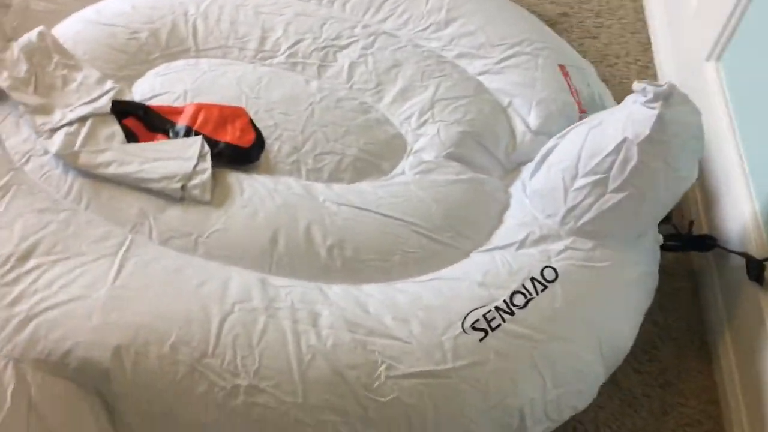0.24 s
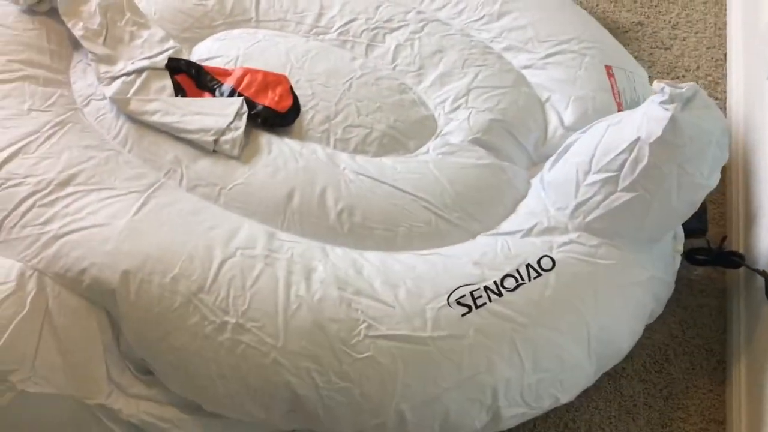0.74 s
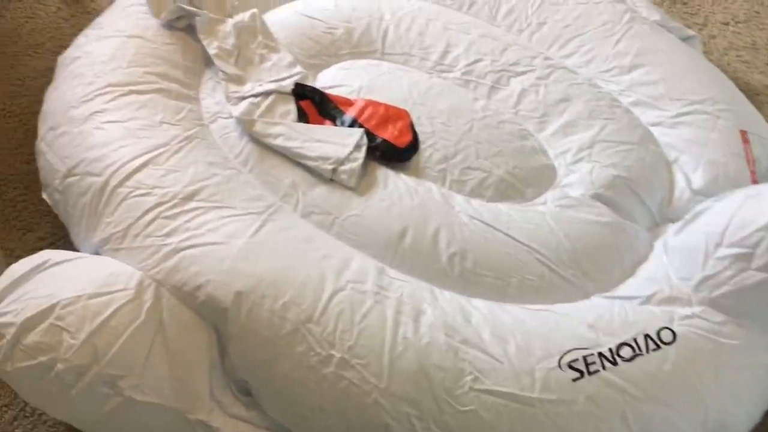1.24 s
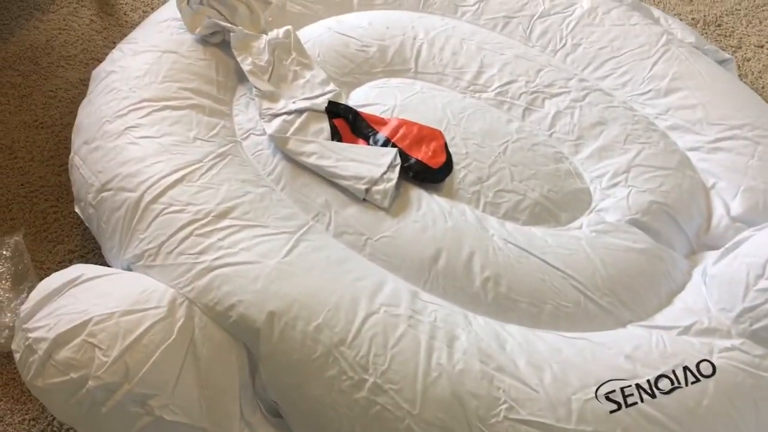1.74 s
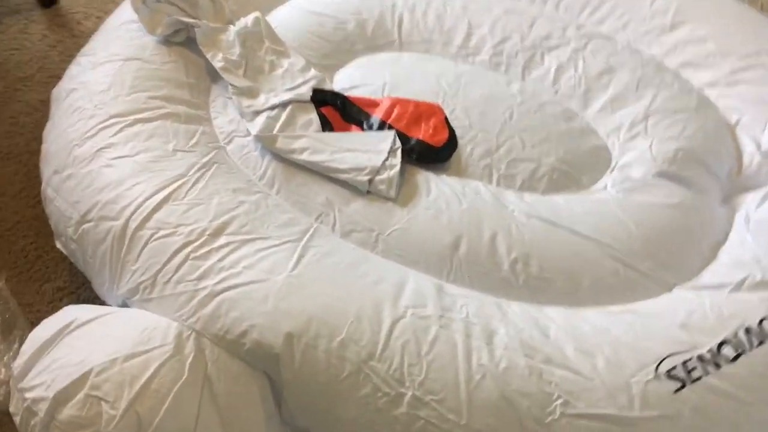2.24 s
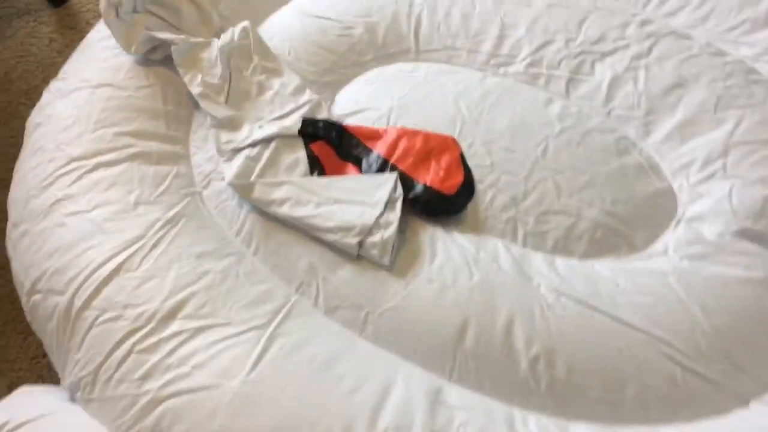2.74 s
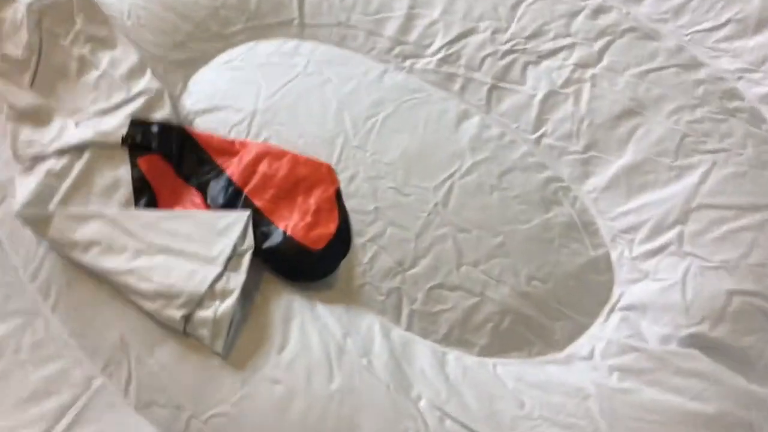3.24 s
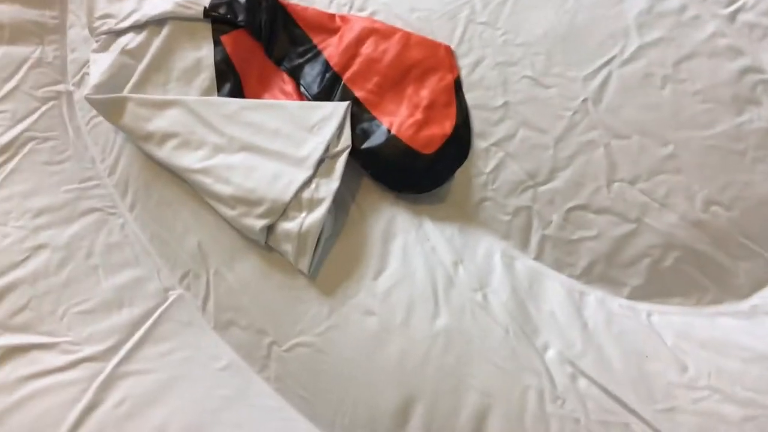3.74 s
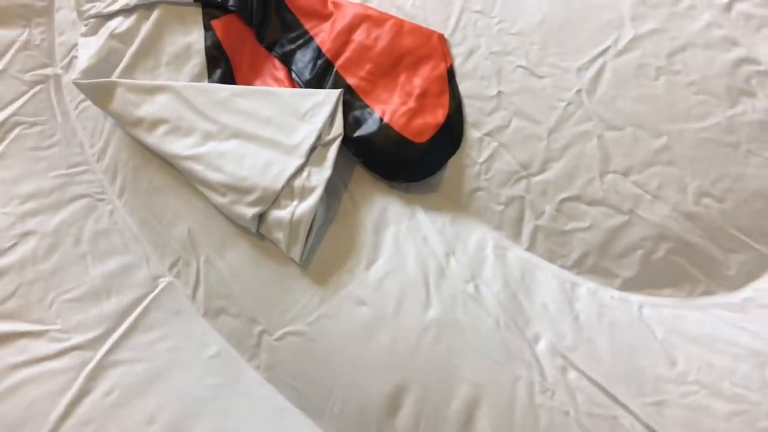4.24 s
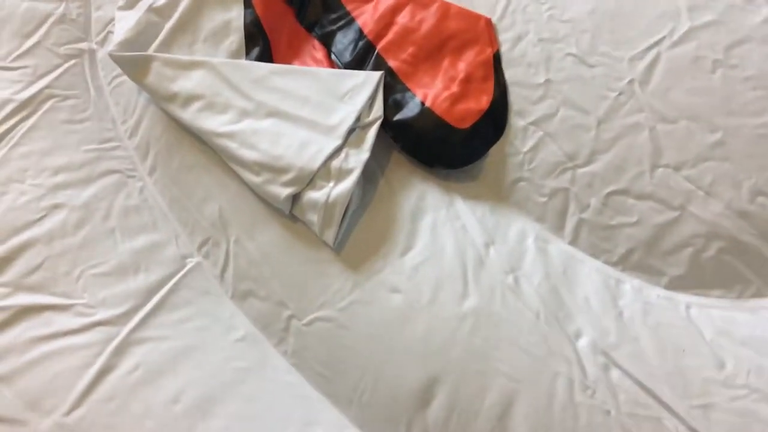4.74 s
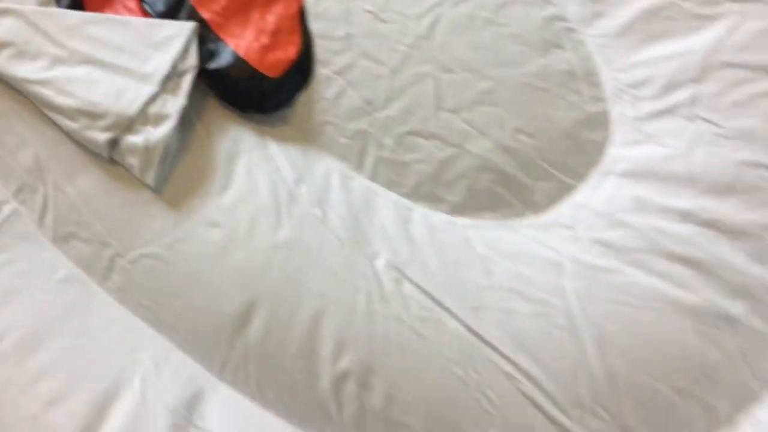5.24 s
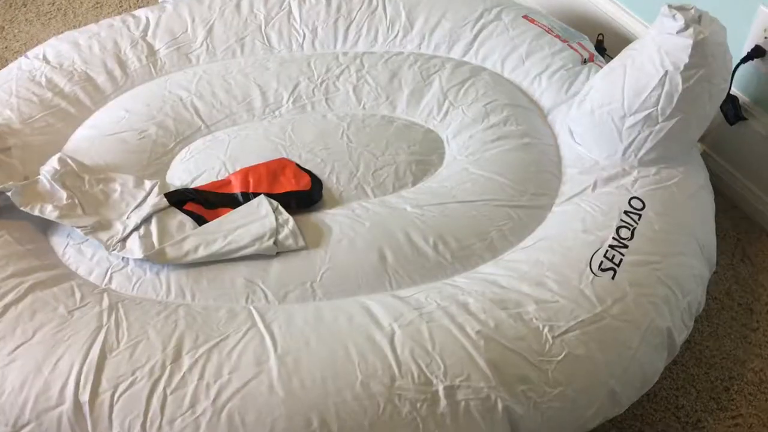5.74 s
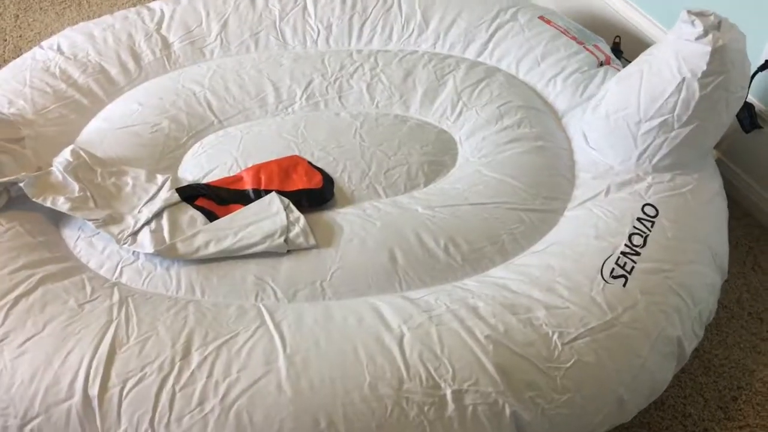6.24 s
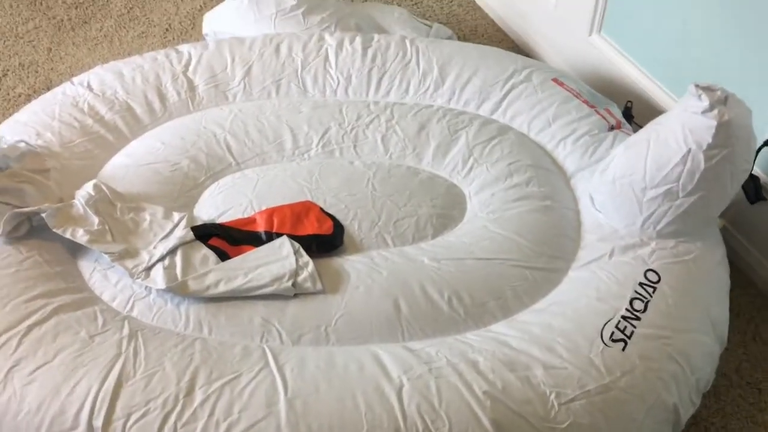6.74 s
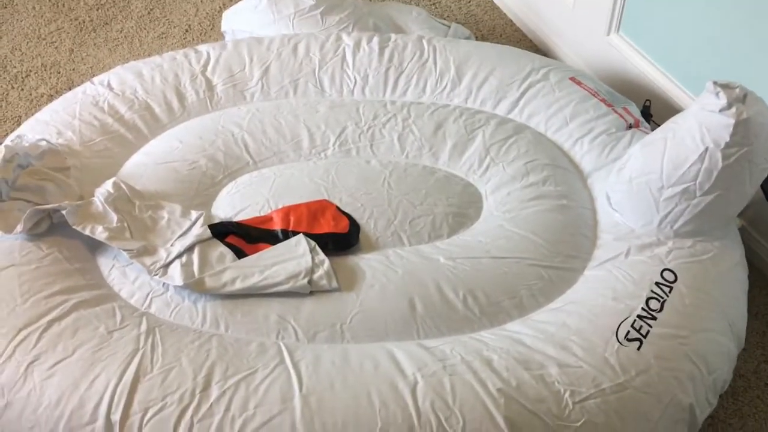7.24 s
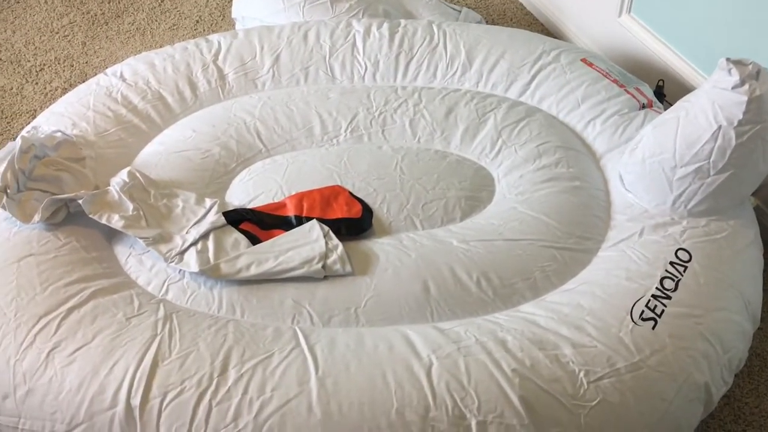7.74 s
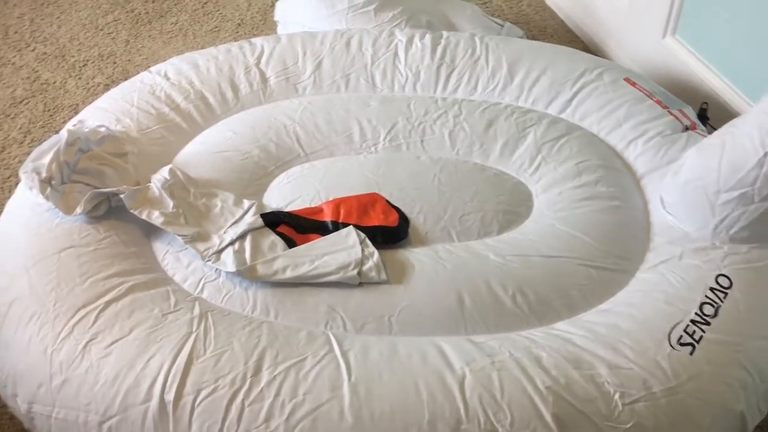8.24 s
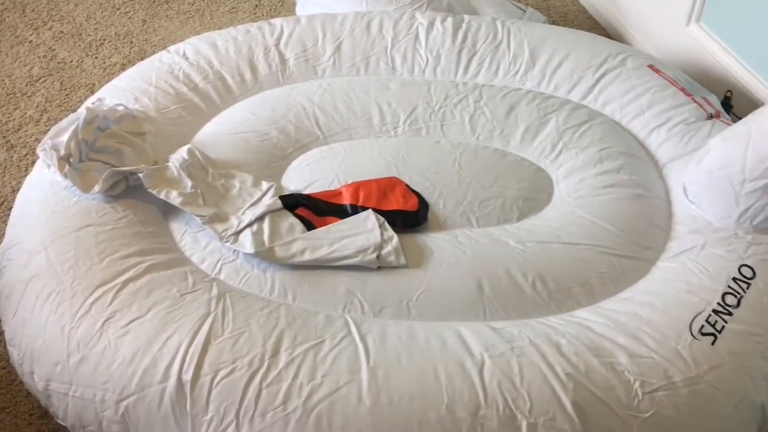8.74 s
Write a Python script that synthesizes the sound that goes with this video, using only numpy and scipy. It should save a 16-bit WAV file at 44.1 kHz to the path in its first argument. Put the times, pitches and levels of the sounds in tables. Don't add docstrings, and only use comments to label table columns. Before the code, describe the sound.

A small electric blower is already running at full noise, filling a large vinyl float on carpet in a small room. A broad, hissy rush of air carries a high whine that swells and fades as the handheld microphone drifts, strongest around 0.2, 0.8 and 2.8 s. A faint low groan of stretching vinyl slides down at 0.3-0.6 s, and a soft bump comes at 1.4 s. From about 1.5 s the motor pitch sags gradually. Near 4.1 s the air becomes louder and more nozzle-like; at 4.64 s a very short burst of treble marks a further pitch drop under load. Dull slaps on the skin follow at 4.7, 4.85 and 5.1 s. At 5.54 s the sound dips out and returns abruptly: steady pitch, whine mostly buried, smoother rush and clearer mains hum. A deep soft thump lands at 8.4 s, and the blower runs on to the end at 9 s.

```python
import sys
import numpy as np
from scipy import signal
from scipy.fft import rfft, irfft, next_fast_len
from scipy.io import wavfile

SR = 44100
rng = np.random.default_rng(int(sys.argv[2]) if len(sys.argv) > 2 else 0)


def volts_from_db(level):
    exponent = np.asarray(level, float) / 20
    return 10 ** exponent


def master_out(mix):
    frames = np.transpose(np.atleast_2d(mix))
    ceiling = np.clip(frames, -1, 1)
    pcm = np.round(ceiling * 32767).astype(np.int16)
    wavfile.write(sys.argv[1], SR, pcm)


N = 396454
GUST_S = 4.64
TOP_HZ = 15720

SPOT_ENDS_S = [0, 4.135, 4.67, 5.541, 9]
CHANGE_S = SPOT_ENDS_S[3]
# (time [s], facing the intake [dB], shaded from the housing by the float [dB])
MICROPHONE = [(0, -3.5, -0.5), (1.3, -3.5, 1), (1.9, -0.8, 1), (2.15, 0.5, -1.5), (2.43, -1, -2),
              (2.73, 3.5, -5), (3.22, 5, -2), (3.42, -1, -7), (3.8, -0.5, -7), (4.1, -0.5, -17),
              (4.5, -1.5, -9.5), (4.62, -2, -8), (5, -1, -5), (5.5, 0, -4), (5.9, 0.5, -9), (7.2, 1.3, -8),
              (8.1, -0.3, -10.5), (9, 1, -10)]


def columns(table):
    s, *rest = np.transpose(table)
    return [np.interp(np.arange(N) / SR, s, column) for column in rest]


def walk(rate):
    return np.interp(np.arange(N) * (rate / SR), np.arange(400), 1.2 * rng.standard_normal(400))


def tone(hz, db):
    turns = np.cumsum(hz + np.zeros(N)) / SR
    return np.sqrt(2) * volts_from_db(db) * np.sin(2 * np.pi * (turns + rng.random()))


def bell(s, width):
    out = np.zeros(N)
    start, stop = max(int((s - 3 * width) * SR), 0), min(int((s + 3 * width) * SR), N)
    t = np.arange(start, stop) / SR
    out[start:start + len(t)] = np.exp(-((t - s) / width) ** 2)
    return out


def speed():
    # (time [s], speed [Hz])
    sag = [(0, 716.3), (.45, 715.7), (.75, 717.2), (1.5, 712.8), (1.75, 708.2), (2, 701.9), (2.25, 698.9),
           (2.75, 680.4), (3, 677.5), (3.5, 667.5), (3.75, 665.8), (4, 660.7), (4.25, 647.7), (4.4, 640.8),
           (4.64, 636.4)]
    loaded_hz, settles_s, later_hz = 593.2, .14, 623.6
    t = np.arange(N) / SR
    loaded = loaded_hz + (sag[-1][1] - loaded_hz) * np.exp(-np.maximum(t - GUST_S, 0) / settles_s)
    early = np.where(t > GUST_S, loaded, columns(sag)[0])
    return np.where(t > CHANGE_S, later_hz, early)


def crossings(peaks, trough_db):
    return 20 * np.log10(volts_from_db(trough_db) + sum(volts_from_db(db) * bell(s, width) for s, width, db in peaks))


def whistles(hz, late):
    # (shaft multiple, plus mains ripples, time [s], half width [s], level [dB])
    weak_whistles = [(2, 0, .7, 1.15, -46), (2, 0, 3.64, 0.37, -48), (3, 0, .3, 0.66, -44.5),
                     (3, 0, 3.5, 1.2, -46), (3, 1, 4.9, 1.7, -43), (3, 2, .9, .9, -59),
                     (3, 2, 3.91, 0.29, -39.5), (4, 0, 1.4, 2, -48.5), (4, 0, 4.1, .8, -49),
                     (4, 1, 2.7, 2.9, -52), (4, 2, 1.9, 2.2, -67), (5, 0, .9, 2.1, -47.5),
                     (5, 0, 4.3, 0.48, -54), (5, 1, 0.24, .9, -48.5), (5, 2, 3.2, 0.76, -46.5),
                     (6, 0, 0.82, 1.2, -52), (6, 1, 1.2, .8, -45), (5, 1, 2.3, 0.88, -45),
                     (11, 0, 1.2, 0.65, -53), (4, 0, 4.8, 2.5, -54), (5, 0, 9.2, 2.3, -45),
                     (1, 1, 7.3, 2.9, -53), (11, 0, 7.3, 2.3, -71), (12, 0, 7, 2.1, -49)]
    ripple_hz, swim_db, swim_per_s = 240, 3, 7
    t, turns, out = np.arange(N) / SR, np.cumsum(hz) / SR, np.zeros(N)
    for multiple, ripples, s, width, db in weak_whistles:
        heard = bell(s, width) * (late == (s > CHANGE_S))
        on = heard > 0
        cycles = np.rint(multiple) * turns[on] + np.rint(ripples) * ripple_hz * t[on] + rng.random()
        level = heard[on] * volts_from_db(db + swim_db * walk(swim_per_s)[on])
        out[on] += np.sqrt(2) * level * np.sin(2 * np.pi * cycles)
    return out


def hum(late):
    # (pitch [Hz], level [dB], level after the change [dB])
    mains = [(240, -62, -54), (480, -64, -54.5)]
    return sum(tone(f, np.where(late, late_db, db) + walk(9)) for f, db, late_db in mains)


def motor():
    # (blade-pass level [dB], twice blade-pass level [dB])
    troughs = [
        (-42, -47),
        (-44.5, -48),
    ]
    # (time [s], half width [s], level [dB])
    blade_peaks = [(.17, 0.086, -32), (.5, 0.13, -47), (.79, 0.17, -28.5), (1.25, .09, -44),
                   (1.62, .06, -41), (1.8, 0.066, -33.5), (2.15, 0.22, -42), (2.5, 0.074, -35),
                   (2.8, 0.15, -26), (3.08, 0.14, -29), (3.4, 0.18, -35.5), (3.86, 0.22, -37.5),
                   (4.76, 0.17, -33.5), (5.1, 0.043, -42), (5.32, 0.089, -38), (5.78, 0.11, -50),
                   (6.4, 0.089, -56), (7.55, 0.14, -46.5), (8.1, 0.3, -48.5), (9, .12, -47)]
    # (time [s], half width [s], level [dB])
    twice_peaks = [(.05, .17, -42), (.62, .1, -44), (.88, .1, -49), (2.2, .07, -45), (2.75, 0.38, -51),
                   (3.02, 0.084, -38), (3.28, .09, -39), (3.5, .05, -39), (3.75, .08, -43), (4.1, .07, -55),
                   (4.38, .07, -37.5), (4.65, 0.085, -34), (4.79, 0.068, -36), (5.1, .06, -36),
                   (5.3, 0.051, -41), (5.52, 0.067, -45), (6.4, .3, -54), (8.4, 0.33, -48),
                   (8.95, 0.17, -47)]
    late = np.arange(N) / SR > CHANGE_S
    blade_trough_db, twice_trough_db = np.array(troughs)[late.astype(int)].T
    shaft_db = -39 + columns(MICROPHONE)[1]
    blade_db = crossings(blade_peaks, blade_trough_db)
    twice_db = crossings(twice_peaks, twice_trough_db)

    hz = speed() * (1 + 0.00042 * walk(36))
    out = tone(hz, shaft_db + 0.72 * walk(21))
    out += tone(10 * hz, blade_db + 2.66 * walk(32))
    out += tone(20 * hz, twice_db + 2.4 * walk(31))
    return out + whistles(hz, late) + hum(late)


def room():
    echo_t60_s, echo_db = 0.19, -5
    t = np.arange(SR // 2) / SR
    tail = rng.standard_normal(len(t)) * volts_from_db(-60 * t / echo_t60_s) * (t > .003)
    dulled = signal.lfilter(*signal.butter(1, 10000, fs=SR), tail)
    echo = volts_from_db(echo_db) * dulled / np.sqrt(np.sum(tail ** 2))
    echo[0] = 1
    return echo


def swell(spot, span):
    follows_facing = [.01, -0.2, 0.0035, 0.42, .55, 0.37, 0.023, 1.32, 0.52]
    follows_shade = [-0.037, 0.46, -0.14, -0.2, -0.036, 0.039, -0.28, 0.045, -.3]
    beam_late_s = [0, -0.053, 0.077, 0.16, -0.42, 0.17, 0.2, 0.01, .2]
    shade_mean_db = [-9.5, -18, -17.5, -13]
    nozzle_opens_db, nozzle_opens_s = 1, 0.33
    t = np.arange(N)[span] / SR
    s, facing_db, shade_db = np.transpose(MICROPHONE)
    shade_db = np.interp(t, s, shade_db) - shade_mean_db[spot]
    out = np.array([facing * np.interp(t - late, s, facing_db) + shade * shade_db
                    for facing, shade, late in zip(follows_facing, follows_shade, beam_late_s)])
    if spot == 1:
        out[2] += nozzle_opens_db * np.clip(1 - (t - SPOT_ENDS_S[1]) / nozzle_opens_s, 0, 1)
    return out


def air(swell_db, colour, rings, db, span):
    swell_hz = [250, 900, 2500, 3400, 4700, 7500, 9600, 11500, 14300]
    n = span.stop - span.start
    size = next_fast_len(n)
    hz = np.maximum(np.arange(size // 2 + 1) * SR / size, 1)
    colour_hz, colour_db = np.transpose(colour)
    gain_db = np.interp(np.log(hz), np.log(colour_hz), colour_db)
    gain_db += sum(peak_db / (1 + (2 * (hz - f) / width) ** 2) for f, width, peak_db in rings)
    noise = rfft(rng.standard_normal(size)) * rfft(room(), size) * volts_from_db(gain_db) * (hz < TOP_HZ)
    noise *= volts_from_db(db) * size / np.sqrt(2 * np.sum(np.abs(noise) ** 2))

    centres = np.log([250, 900, 1500, 2500, 3400, 4700, 7500, 9600, 11500, 14300])
    flutter_db = (0.52 * walk(7.2) + 0.27 * walk(23))[span]
    out = np.zeros(N)
    for centre, share in zip(centres, np.eye(len(centres))):
        mix = [np.interp(centre, np.log(swell_hz), row) for row in np.eye(len(swell_hz))]
        band_db = mix @ swell_db + flutter_db + .6 * walk(9)[span]
        band = irfft(noise * np.interp(np.log(hz), centres, share), size)[:n]
        out[span] += volts_from_db(band_db) * band
    return out


def blower_air():
    # (frequency [Hz], level [dB per Hz])
    colours = [
        [(30, -43), (60, -30), (100, -15), (200, -24.5), (400, -5), (650, -8), (1300, -1.9), (2400, -1.5),
         (3500, -6), (5500, -4.5), (7200, -1.5), (9800, -7.5), (11500, -2), (15700, -11.5)],
        [(30, -54), (60, -26), (100, -26), (200, -20), (400, -12.5), (800, -18), (1600, -14.5), (2400, 3.5),
         (3500, -11.5), (5500, -14), (7200, -7.5), (9800, -13), (12500, -9), (15700, -11)],
        [(30, -49), (60, -28), (100, -22), (200, -18), (400, -15.5), (800, -13.5), (1600, -7), (2400, 3.5),
         (3500, 1), (5500, -14.5), (7200, -5), (9800, -4.5), (12500, -5.5), (15700, -10)],
        [(30, -49), (60, -27), (100, -27), (200, -20.5), (400, -9), (650, -5.5), (1300, -7.5), (2400, 0.46),
         (3500, -8.5), (5500, -14.5), (7200, -7.5), (9800, -15.5), (11500, -11.5), (15700, -15.5)],
    ]
    rush_db = [-28.5, -22.5, -24.5, -25]
    # (frequency [Hz], width [Hz], level [dB])
    rings_over = [(149, 26, 1), (175, 26, 7.5), (380, 22, -9.5), (510, 48, -10), (620, 44, 7),
                  (742, 40, 8.5), (1190, 21, -12.5), (1596, 66, -6), (1746, 74, 3), (1933, 78, 4.7),
                  (2515, 19, 10.5), (4010, 200, 4.5), (4447, 400, 8.5), (4910, 150, 6)]
    # (frequency [Hz], width [Hz], level [dB])
    rings_singing = [(350, 48, -10.5), (705, 40, 5), (840, 28, 7), (1140, 37, -9), (1250, 40, 6.5),
                     (1340, 40, -4.9), (1960, 61, 11), (2270, 65, -16), (2380, 30, 9), (2670, 78, 5.5),
                     (3880, 56, 7), (4050, 100, 2.5), (4400, 500, 6.5), (6736, 150, -10)]
    # (frequency [Hz], width [Hz], level [dB])
    rings_loaded = [(337, 40, -6.6), (545, 46, 7), (725, 40, 7), (850, 60, 5.5), (1665, 54, -13),
                    (2000, 40, -7), (2305, 40, 3), (4005, 160, -6), (4460, 100, 3.6), (4941, 100, 2),
                    (6100, 420, 8), (9183, 360, 0), (10060, 260, -9), (14100, 1300, 6.5)]
    # (frequency [Hz], width [Hz], level [dB])
    rings_later = [(490, 30, -15), (562, 53, -10.5), (687, 24, -8.5), (802, 12, -6.5), (873, 22, -19),
                   (1270, 16, -10), (1350, 31, -10), (1695, 84, -8.5), (1923, 100, 8.5), (2075, 41, -12),
                   (2280, 39, 7.5), (2527, 20, 8.5), (2678, 137, 7), (3020, 270, 4.5)]
    rings = rings_over, rings_singing, rings_loaded, rings_later
    blend_s = [1e-9, .12, .08, .001, 1]
    gust_length_s, gust_db = .033, 6
    t, out = np.arange(N) / SR, np.zeros(N)
    for k in range(len(colours)):
        last = k == len(colours) - 1
        on = np.clip((t - SPOT_ENDS_S[k]) / blend_s[k] + .5, 0, 1)
        off = np.clip((SPOT_ENDS_S[k + 1] - t) / blend_s[k + 1] + .5 + last, 0, 1)
        heard = np.flatnonzero(on * off)
        span = slice(heard[0], heard[-1] + 1)
        out += np.sqrt(on * off) * air(swell(k, span), colours[k], rings[k], rush_db[k], span)

    rise, fall = (t - GUST_S) / .004, (GUST_S + gust_length_s - t) / .015 + 1
    gust = np.clip(np.minimum(rise, fall), 0, 1)
    treble = signal.sosfilt(signal.butter(1, [2800, 10500], "band", fs=SR, output="sos"), out)
    return out + (volts_from_db(gust_db) - 1) * gust * treble


def vinyl():
    # (time [s], peak level [dB], pitch [Hz], t60 [s], slap level [dB])
    bumps = [
        (1.43, -46, 160, .15, -65),
        (4.731, -41, 165, .16, -33),
        (4.85, -45, 150, .12, -38),
        (5.117, -43, 165, .3, -32),
        (5.155, -45, 160, .35, -39),
        (8.425, -39, 95, .27, -67),
    ]
    # (time [s], pitch [Hz], level [dB])
    stretch = [
        (.22, 147.5, -73),
        (.3, 147, -56),
        (.45, 141, -57),
        (.56, 133.5, -57),
        (.66, 131, -69),
    ]
    out, t = np.zeros(N), np.arange(SR // 2) / SR
    low = signal.butter(2, [130, 650], "band", fs=SR, output="sos")
    for s, db, hz, t60, slap_db in bumps:
        attack = np.minimum(t * hz / 0.65, 1)
        ring = volts_from_db(db - 60 * t / t60) * np.sin(2 * np.pi * hz * t) * attack
        slap = signal.sosfilt(low, rng.standard_normal(len(t)) * np.exp(-t / .009))
        i = int(s * SR)
        out[i:i + len(t)] += (ring + volts_from_db(slap_db + 15.5) * slap)[:N - i]
    time = np.arange(N) / SR
    return out + tone(*columns(stretch)) * (time > stretch[0][0]) * (time < stretch[-1][0])


def scene():
    return np.tile(motor() + blower_air() + vinyl(), (2, 1))


def patches(x):
    count, length_s, level_db = 27, .045, -4.5
    out, n = np.zeros(N), int(length_s * SR)
    for when, where in rng.random((count, 2)):
        i = int(when * (N - 3 * n)) + n
        hz = 4300 * 3.3 ** where
        band = signal.ellip(8, 1, 80, [hz, hz + 1600], "band", fs=SR, output="sos")
        backwards = x[i + 2 * n:i - n:-1]
        out[i:i + n] += np.hanning(n) * signal.sosfilt(band, backwards)[-n:]
    return volts_from_db(level_db) * out * np.array([[1], [-1]])


def low_pass(x):
    return signal.sosfilt(signal.butter(12, 17090, fs=SR, output="sos"), x)


def record(dry):
    # (fade out [s], its cut-short end [s], fade in [s])
    fades_s = (.024, .004, .04)
    out, left, back = fades_s
    since = np.arange(N) / SR - CHANGE_S
    falling = (left - since) / (out + left)
    rising = (np.abs(since + left) / back) ** 1.7
    fade = np.clip(np.where(since < 0, falling, rising), 0, 1)
    top = signal.ellip(10, .2, 70, TOP_HZ, fs=SR, output="sos")
    return low_pass(signal.sosfilt(top, (dry + patches(dry[0])) * fade))


dry = scene()
out = record(dry)
master_out(out)
```